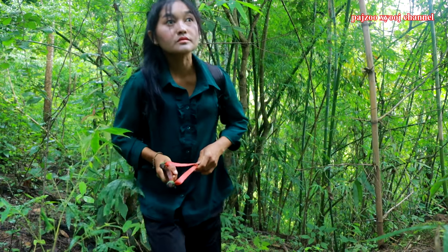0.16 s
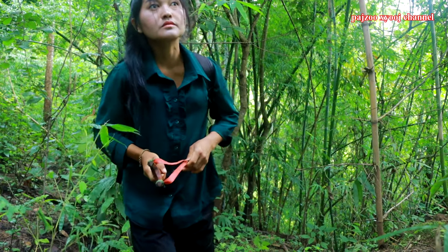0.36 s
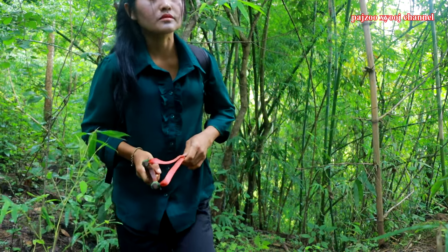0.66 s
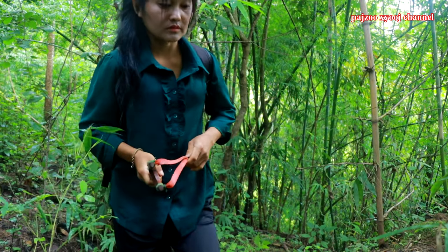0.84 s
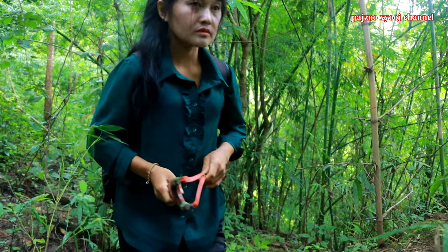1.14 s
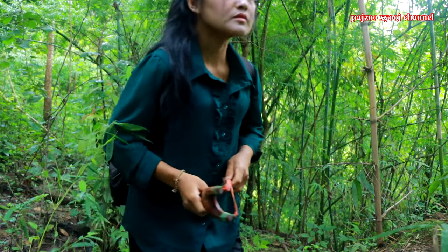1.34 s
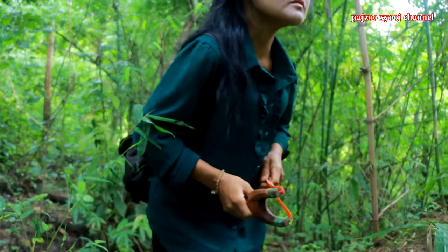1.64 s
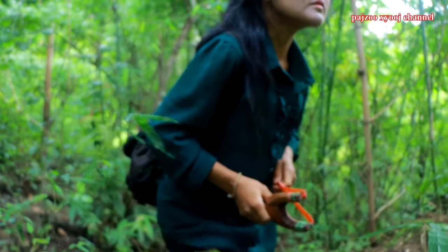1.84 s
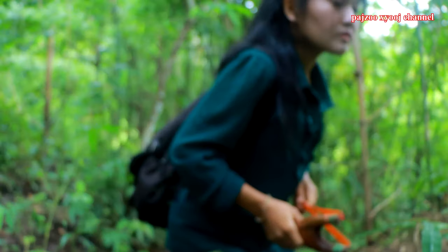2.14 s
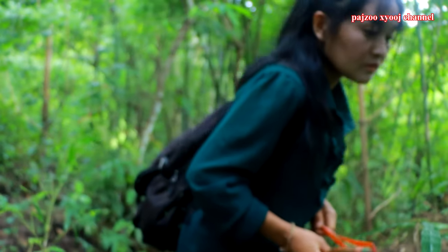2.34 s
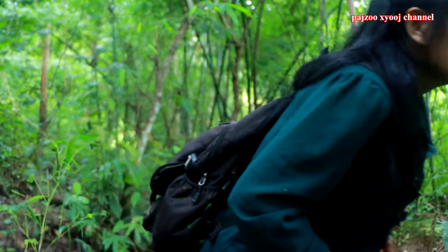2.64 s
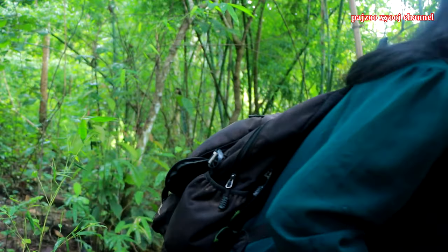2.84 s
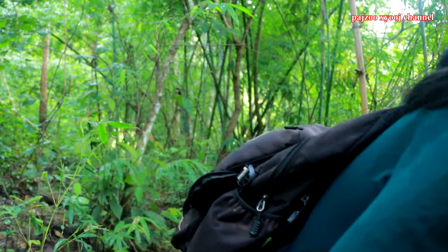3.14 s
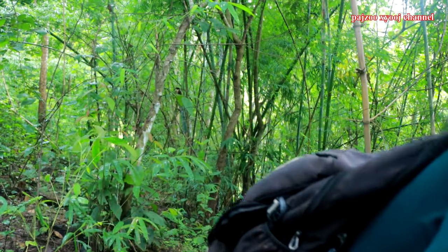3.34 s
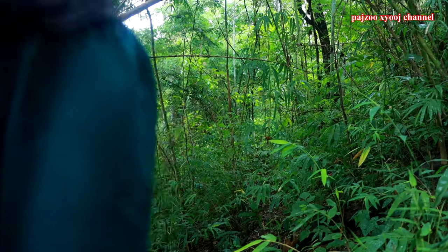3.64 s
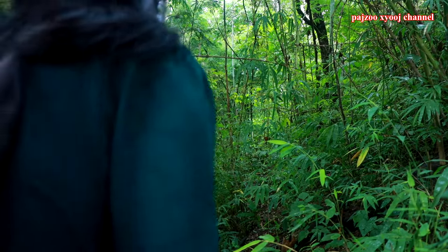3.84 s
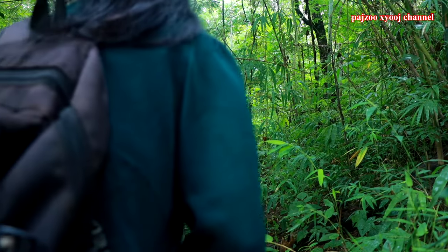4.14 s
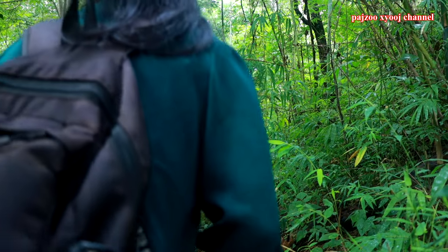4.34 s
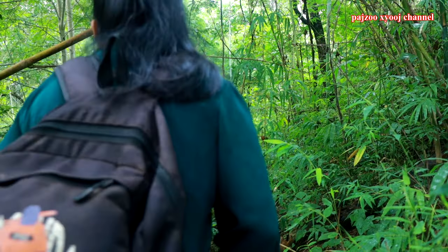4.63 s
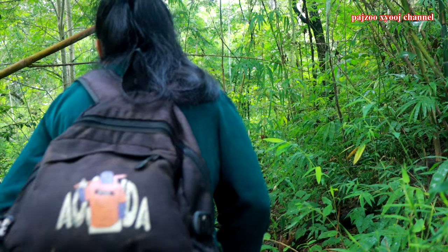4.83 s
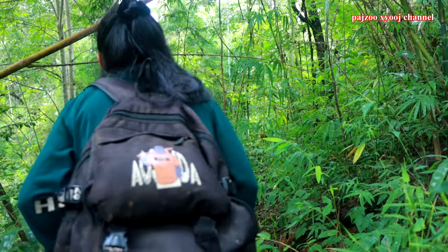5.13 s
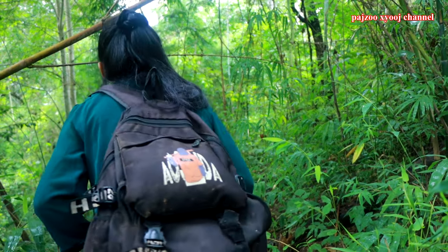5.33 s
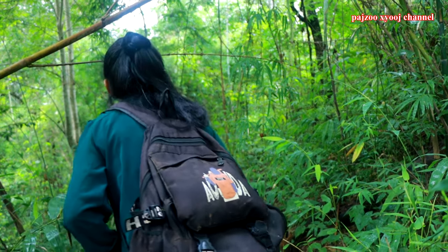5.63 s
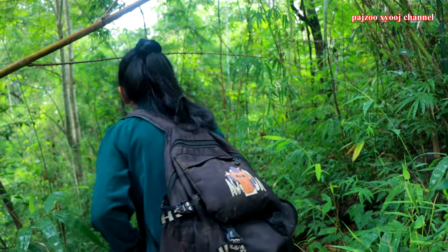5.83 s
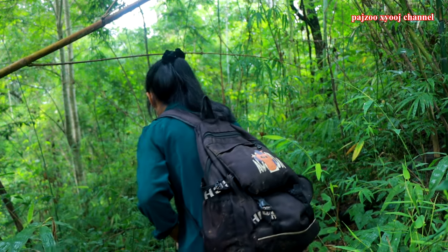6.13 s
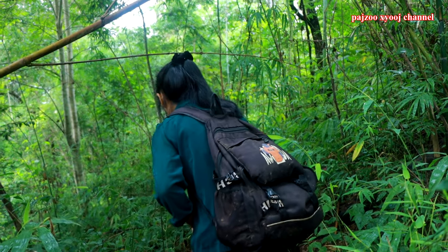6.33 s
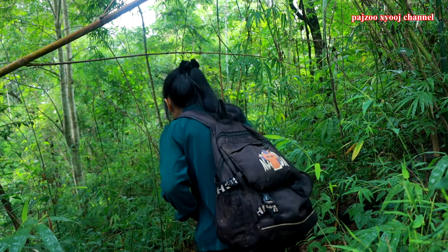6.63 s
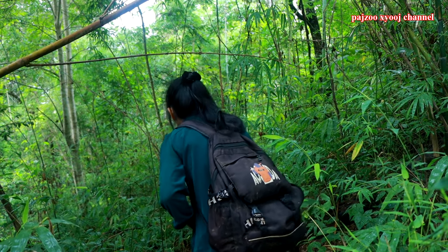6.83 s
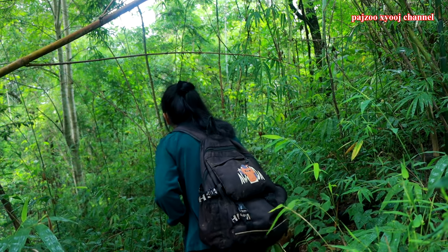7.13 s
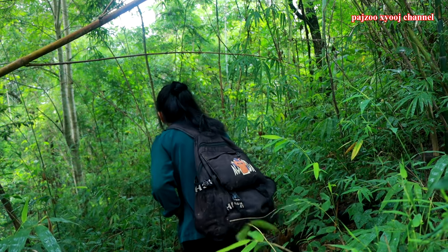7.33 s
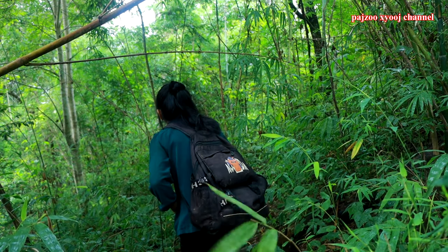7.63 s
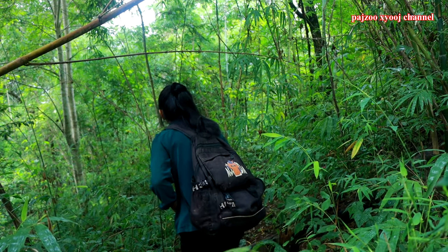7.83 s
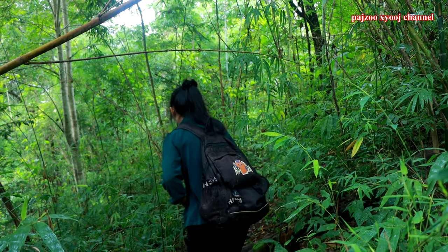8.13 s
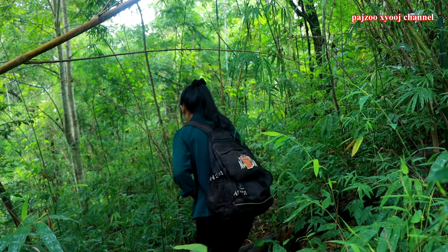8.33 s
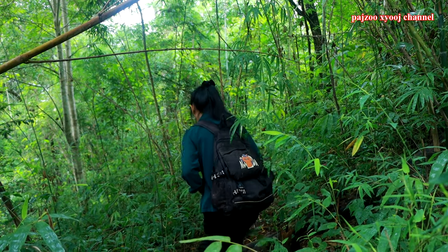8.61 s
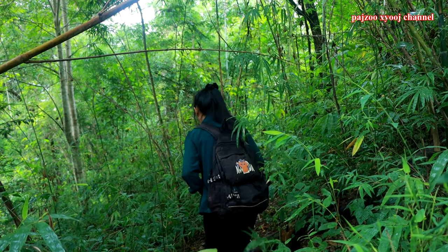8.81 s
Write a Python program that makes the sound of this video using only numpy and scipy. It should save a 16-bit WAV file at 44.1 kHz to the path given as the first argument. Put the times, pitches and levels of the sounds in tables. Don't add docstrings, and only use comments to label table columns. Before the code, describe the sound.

Throughout, a dense, high cicada drone surrounds a wide stereo outdoor microphone, over faint air hiss; bush-crickets rasp below it in swells about three times a second, and a thin steady cricket tone sits above. From 0 s someone creeps close by, with small leaf crackles and dry twig snaps. A far bird gives low, rounded hoots at 1.2-1.7 s. Leaf crunches and snaps thicken around 1.6-2.3 s, then again from 2.6 to 3.5 s, with soft foot thuds. At 3.65 s the sound dips for an instant, followed by a tight burst of cracks. The drone changes colour, trills join, and a nearer cicada throbs about 22 times a second. Steps become sparser. Hollow bamboo pings sound near 5.6, 6.5, 7.4 and 7.7 s, the last loudest with a snap and thud. A small bird peeps and whistles downward at 5.8-6.3 s, hoots return at 6.2-6.7 s, and peeps come again near 8.7 s amid final rustles.

```python
import sys
import numpy as np
from scipy import signal
from scipy.fft import rfft, irfft, next_fast_len
from scipy.io import wavfile

SR = 44100
rng = np.random.default_rng(int(sys.argv[2]) if len(sys.argv) > 2 else 0)


def attenuation_scalar(level_db):
    decades = np.asarray(level_db, float) / 20
    return 10 ** decades


def store_wav(level_fs):
    pcm = np.round(np.clip(np.atleast_2d(level_fs), -1, 1) * 32767)
    wavfile.write(sys.argv[1], SR, pcm.T.astype(np.int16))


N = 395577
CHANGE_S = 3.6555


def evened(x):
    return x / np.sqrt(np.mean(x ** 2) + 1e-20)


def read(points, hz):
    f, value = np.transpose(points)
    return np.interp(np.log(hz + 1), np.log(f + 1), value)


def curves(rows):
    s, *columns = np.transpose(rows)
    return [np.interp(np.arange(N) / SR, s, column) for column in columns]


def coloured(x, spectrum):
    length = next_fast_len(N, real=True)
    hz = np.fft.rfftfreq(length, 1 / SR)
    inside = (hz > spectrum[0][0]) & (hz < spectrum[-1][0])
    gain = attenuation_scalar(read(spectrum, hz)) * inside
    return evened(irfft(rfft(x, length) * gain, length)[..., :N])


def panned(x, left_minus_right_db):
    half_db = left_minus_right_db / 2
    return x * attenuation_scalar(np.array([half_db, -half_db]).reshape(2, -1))


def wander(per_s, size):
    knots = rng.standard_normal((size, int(per_s * 2 * N / SR)))
    knots = signal.resample(knots, N // 64 + 2, axis=1)
    at = np.arange(N) / 64
    return evened(np.array([np.interp(at, np.arange(len(row)), row) for row in knots]))


def resonate(x, hz, width_hz):
    turn = np.exp(2j * np.pi * hz * np.arange(N) / SR)
    r = np.exp(-np.pi * width_hz / SR)
    return 2 * (turn * signal.lfilter([(1 - r) ** 2], [1, -2 * r, r * r], x / turn)).real


def add(mix, s, sound):
    part = mix[:, round(s * SR):][:, :sound.shape[1]]
    part += sound[:, :part.shape[1]]


def forest(x, t60):
    t = np.arange(SR // 2) / SR
    taps = rng.standard_normal((2, len(t))) * attenuation_scalar(-60 * t / t60) * (t > .004)
    return signal.oaconvolve(x, taps / np.linalg.norm(taps[0]), axes=1)[:, :N]


# pitch_hz, level_db (per Hz)
AIR_SPECTRUM = [(18, -16), (45, -10.5), (90, -0.5), (140, 2), (400, -2), (1000, -2.5), (2000, -2.5),
                (3400, -3.5), (6600, -12), (7500, -4.5), (9500, -11), (12500, -7.5), (14000, -16),
                (16000, -10.5)]
# pitch_hz, likeness (1 = the same)
AIR_LIKENESS = [(60, 0.88), (130, 0.58), (290, 0.72), (640, 0.49), (1410, 0.14), (3100, -0.047),
                (6820, 0.079), (15000, -0.23)]


def air():
    length = next_fast_len(N, real=True)
    left, other = rfft(rng.standard_normal((2, length)))
    same = np.clip(read(AIR_LIKENESS, np.fft.rfftfreq(length, 1 / SR)), -1, 1)
    right = same * left + np.sqrt(1 - same ** 2) * other
    pair = irfft(np.array([left, right]), length)[:, :N]
    return attenuation_scalar(-52.5 + 0.4 * wander(7.6, size=1)) * coloured(pair, AIR_SPECTRUM)


# start_s, pitch_hz, width_hz, pulses_per_s (0 = steady), level_db
INSECT_TONES = [
    (3.66, 6355, 35, 40, -59),
    (3.66, 7770, 120, 55, -67),
    (0, 10950, 30, 0, -69),
    (3.66, 11540, 60, 0, -70),
]


def insect_tones():
    t, out = np.arange(N) / SR, 0
    for s, hz, width_hz, per_s, db in INSECT_TONES:
        pulses = np.cos(np.pi * per_s * t) ** 4 * (t > s)
        tone = evened(resonate(rng.standard_normal((2, N)), hz, width_hz))
        out = out + attenuation_scalar(db + 2.5 * wander(1.5, size=1)) * pulses * tone
    return out


# pitch_hz, level_db (per Hz)
RASP_SPECTRUM = [(3500, -9.5), (3800, 2), (4050, 9), (4300, 11), (4550, 9), (4800, -29), (5100, -53)]
# time_s, left_minus_right_db
GROUP_SIDE = [(0.0, 0.5), (4.19, -0.5), (8.97, -1)]
# time_s, swell_db
GROUP_SWELLS = [(.08, 1.5), (.3, 3.5), (.65, 1.5), (1.0, 3), (1.22, 4.5), (1.6, 4), (1.97, 3), (2.37, 4.5),
                (2.72, 6.5), (3.12, 5.5), (3.48, 4), (4.02, 3.5), (4.28, 0.5), (4.52, 4), (4.92, 2.5),
                (5.33, 4), (5.75, -1), (5.98, 3.5), (6.3, 4.5), (6.68, 3.5), (7.03, 2.5), (7.3, 2),
                (7.52, 4.5), (7.82, 5), (8.2, 1), (8.42, 4), (8.69, 5), (8.93, 3.5)]


def bush_crickets():
    base_db, half_width_s = -52.5, .085
    t, (pan_db,) = np.arange(0, N, 64) / SR, curves(GROUP_SIDE)
    db = base_db + sum(swell_db * np.exp(-((t - s) / half_width_s) ** 2) for s, swell_db in GROUP_SWELLS)
    db = np.interp(np.arange(N) / SR, t, db)
    teeth_per_s = 52 + 9 * wander(2.1, size=2)
    teeth = 1 + 0.35 * np.sin(2 * np.pi * np.cumsum(teeth_per_s, axis=1) / SR)
    rasp = coloured(teeth * rng.standard_normal((2, N)), RASP_SPECTRUM)
    below = resonate(rasp, 3970, 770)
    low, high = attenuation_scalar(2.2 * wander(9, size=2))
    return panned(attenuation_scalar(db + 4.0) * (low * below + high * (rasp - below)), pan_db)


# pitch_hz, level_db (per Hz)
CHORUS_BANDS = [
    [(4450, -35), (4700, -8.5), (4950, -16), (5200, 4), (5300, 1), (5370, 10), (5520, 5), (5700, 7.5),
     (5790, 0), (5900, -7.5), (6000, -5), (6200, -23), (6500, -20), (6800, -89)],
    [(4450, -27), (4700, -19.5), (4950, -17), (5200, -6), (5300, -1.5), (5370, 2.5), (5520, -2),
     (5720, 0.5), (5790, -4.5), (5900, -7), (6000, -20.5), (6200, -21), (6500, -29.5), (6800, -105)],
]
# pitch_hz, level_db (per Hz)
CHORUS_OCTAVES = [
    [(9800, -68), (10500, 5), (10880, 17), (10950, 11), (11050, 2), (11350, 17), (11600, 4), (12300, -44)],
    [(9800, -64), (10500, 0), (10880, 1.5), (10950, -9), (11120, -1), (11350, 0), (11540, 0.5), (11620, -1),
     (12300, -37)],
]
# time_s, level_db, left_minus_right_db, overtone_level_db
CHORUS_LEVEL = [(0.0, -36.5, 1, -57.5), (3.42, -37, 2, -57), (3.7, -36, -1.5, -56), (6.64, -36, 0.5, -55.5),
                (7.14, -36.5, -1.5, -55.5), (7.79, -35, 1, -56.5), (8.97, -36.5, -0.5, -55)]


def chorus():
    db, pan_db, overtone_db = curves(CHORUS_LEVEL)
    clicks = rng.standard_normal((2, 2, N)) * (rng.random((2, 2, N)) < .2)
    later = np.arange(N) > CHANGE_S * SR
    band_before, band_after = [coloured(clicks[0], spectrum) for spectrum in CHORUS_BANDS]
    octave_before, octave_after = [coloured(clicks[1], spectrum) for spectrum in CHORUS_OCTAVES]
    band = np.where(later, band_after, band_before)
    octave = np.where(later, octave_after, octave_before)
    band[1] += 0.16 * np.roll(band[0], shift=3)
    flutter = attenuation_scalar(0.052 * wander(40, size=2))
    return flutter * panned(attenuation_scalar(db + 4.0) * band + attenuation_scalar(overtone_db) * octave, pan_db)


# time_s, throb_lead_turns, level_db
NEAR_SONG = [(3.66, -.02, -45), (4.7, .29, -43), (5.5, .46, -43), (7.1, .64, -44), (8.55, .78, -42),
             (8.97, .8, -54)]
# place_turns, length_turns, lead_share, pitch_hz,
# level_db, overtone_level_db
NEAR_RIBS = [
    (0., .5, 1, 5725, 0, -7),
    (.255, .4, -.3, 5905, -7, -26),
    (.6, .3, 1, 5660, -5, -22),
    (0., .45, 1, 5785, -14, -12),
    (0., .35, 1, 5920, -16, -11),
]


def near_cicada():
    throbs_per_s = 22.1
    lead, db = curves(NEAR_SONG)
    t, song = np.arange(N) / SR, 0
    for place, length, share, hz, rib_db, overtone_db in NEAR_RIBS:
        off = (throbs_per_s * t + share * lead - place + .5) % 1 - .5
        burst = np.cos(np.pi * np.clip(off / length, -.5, .5)) ** 2
        phase = 2 * np.pi * np.cumsum(hz + 16 * wander(30, size=1), axis=1) / SR
        song = song + burst * (attenuation_scalar(rib_db) * np.sin(phase) + attenuation_scalar(overtone_db) * np.sin(2 * phase))
    song = attenuation_scalar(db - 1.5) * song * (t > CHANGE_S)
    echo = attenuation_scalar(-7) * forest(song, t60=.3)
    return panned(song, -1.5) * attenuation_scalar(1.3 * wander(8, size=2)) + echo


def bird(notes, glide, loudest, waver_hz, wet_db, t60, pan_db):
    song, waver = np.zeros((1, N)), waver_hz * wander(70, size=1)[0]
    flutter = attenuation_scalar(3.0 * wander(25, size=2))
    for s, length, from_hz, to_hz, db in notes:
        t = np.arange(s, min(s + length, (N - 1) / SR), 1 / SR)
        u = (t - s) / length
        hz = to_hz + (from_hz - to_hz) * (1 - np.minimum(u / glide, 1)) ** 1.4
        tone = np.sin(2 * np.pi * np.cumsum(hz + waver[(t * SR).astype(int)]) / SR)
        level_db = db + np.interp(u, [0, loudest, 1], [-7, 0, -7])
        note = attenuation_scalar(level_db) * tone * signal.windows.tukey(len(t), .4)
        add(song, s, note[None])
    return flutter * panned(song, pan_db) + attenuation_scalar(wet_db) * forest(song, t60)


# start_s, length_s, from_hz, to_hz, level_db
HOOT_NOTES = [(1.155, .16, 1030, 1385, -50), (1.28, .075, 1380, 1385, -56), (1.2, .1, 1110, 1125, -55),
              (1.34, .11, 1180, 1262, -47), (1.42, .15, 1260, 1265, -56), (1.51, .08, 1070, 1165, -53),
              (1.575, .09, 1095, 1160, -52), (6.175, .08, 1080, 1230, -52), (6.225, .075, 1300, 1365, -50),
              (6.27, .06, 1310, 1280, -55), (6.3, .09, 1250, 1200, -54), (6.37, .075, 1190, 1270, -50),
              (6.43, .13, 1255, 1270, -53), (6.535, .07, 1095, 1175, -53), (6.575, .14, 1180, 1155, -50),
              (8.95, .06, 1150, 1240, -51)]


def far_bird():
    return bird(HOOT_NOTES, glide=.7, loudest=.4, waver_hz=22, wet_db=0, t60=.6, pan_db=.4)


# start_s, length_s, from_hz, to_hz, level_db
WHISTLE_NOTES = [
    (5.848, .05, 3620, 3640, -45),
    (5.935, .05, 4030, 4150, -49),
    (5.995, .042, 4130, 4140, -46),
    (6.03, .21, 3720, 2770, -50),
    (6.06, .22, 3750, 2900, -54),
    (8.67, .06, 3920, 3920, -53),
    (8.745, .06, 3290, 3400, -53),
    (8.78, .09, 3400, 3750, -52),
    (8.85, .115, 3650, 3510, -52),
    (8.88, .05, 3250, 3280, -55),
]


def small_bird():
    return bird(WHISTLE_NOTES, glide=.9, loudest=.5, waver_hz=55, wet_db=4.5, t60=.7, pan_db=-1.5)


# time_s, peak_db, pitch_hz
FOOT_THUDS = [(1.417, -46, 288), (1.927, -53, 353), (2.969, -49, 350), (3.37, -43, 431), (3.412, -46, 382),
              (3.677, -45, 226), (3.689, -49, 145), (3.701, -46, 226), (3.71, -45, 476), (3.722, -49, 215),
              (5.05, -54, 143), (7.683, -50, 498), (7.686, -43, 330)]


def thuds():
    out, t = np.zeros((2, N)), np.arange(2000) / SR
    for s, db, hz in FOOT_THUDS:
        push = np.sin(2 * np.pi * hz * t) * attenuation_scalar(db + 7 - 60 * t * hz / 4)
        add(out, s + 0.0012, push[None])
    return signal.lfilter(*signal.butter(2, 130, "high", fs=SR), out)


# start_s, length_s, crackle_db, crunch_relative_db
LEAF_BRUSHES = [(0.02, 0.13, -57, -2.5), (0.133, 0.3, -63, 4.5), (0.949, 0.082, -54, -2),
                (1.603, 0.23, -52, -0.5), (1.898, 0.12, -53, 1), (1.81, 0.11, -56, 1),
                (2.024, 0.12, -48.5, 0), (2.11, 0.035, -53, 1), (2.171, 0.066, -48, -2.5),
                (2.587, 0.14, -63.5, 9.5), (2.73, 0.21, -57, 4.5), (2.85, .45, -58, 3),
                (3.25, .21, -55.5, 2), (3.656, .055, -55, 7), (4.003, 0.055, -59, -18),
                (4.3, 0.077, -71.5, 17), (5.196, 0.29, -64.5, 6.5), (5.48, 0.55, -58.5, -7),
                (5.95, 0.46, -64.5, 5.5), (6.46, 0.41, -59.5, 3.5), (6.835, 0.3, -54.5, -2),
                (7.139, 0.29, -55, -4.5), (7.655, 0.074, -55.5, -1.5), (7.76, .06, -66, -8),
                (8.535, 0.15, -54.5, 2.5), (8.68, 0.18, -62.5, -3)]


def steps():
    rise_share, fall_s = 0.42, 0.034
    t = np.arange(0, N, 64) / SR
    power = attenuation_scalar([[-70], [-62.5]]) ** 2 * np.ones(len(t))
    for s, length, db, crunch_db in LEAF_BRUSHES:
        rise = np.clip((t - s) / (rise_share * length), 0, 1)
        shape = rise * np.exp(-np.maximum(t - s - length, 0) / fall_s)
        power = power + (attenuation_scalar([[db], [db + crunch_db]]) * shape) ** 2
    return [np.interp(np.arange(N) / SR, t, np.sqrt(p)) for p in power]


# pitch_hz, level_db (per Hz)
CRACKLE_SPECTRUM = [(1200, -5), (2400, 4), (3300, 1.5), (4500, 4), (7000, -0.5), (12000, 1), (14000, -2),
                    (16000, -14)]
# pitch_hz, level_db (per Hz)
CRUNCH_SPECTRUM = [(300, -3.5), (600, -5), (900, -1), (1500, -4), (2600, -10), (3400, -7)]
# pitch_hz, left_minus_right_db
CRUNCH_LEAN = [(60, 0.0), (110, -6), (200, 11), (380, 3.5), (700, -2), (1290, 8.5), (2380, -20.5),
               (4400, -8), (8120, 0.0), (15000, 0.5)]


def leaves():
    crackly, crunchy = steps()
    size = attenuation_scalar(3.54 * np.minimum(rng.exponential(1, (3, N)), 3.6)) * rng.choice([-1., 1.], (3, N))
    cracks = size * (rng.random((3, N)) < 4500 / SR)
    cracks = cracks[:2] + 0.48 * cracks[2]
    struck = size * (rng.random((3, N)) < 900 / SR)
    bit, crunch = rng.integers(0, 10, size=(3, N)), 0
    for k, hz in enumerate(np.geomspace(330, 3300, num=10)):
        t = np.arange(0, 10 / hz, 1 / SR)
        ring = np.sin(2 * np.pi * hz * t) * attenuation_scalar(-60 * t * hz / 12) * (1 - np.exp(-t * hz))
        ring = ring / np.linalg.norm(ring) * attenuation_scalar(read(CRUNCH_SPECTRUM, hz)) * np.sqrt(hz)
        rung = signal.oaconvolve(struck * (bit == k), ring[None], axes=1)[:, :N]
        apart = hz / 700
        pair = (rung[:2] * apart + rung[2]) / np.hypot(apart, 1)
        crunch = crunch + panned(pair, read(CRUNCH_LEAN, hz))
    clumps = attenuation_scalar(2.5 * wander(22, size=2) - 1)
    crackle = attenuation_scalar(6.0) * crackly * clumps[0] * coloured(cracks, CRACKLE_SPECTRUM)
    return crackle + attenuation_scalar(1.5) * crunchy * clumps[1] * evened(crunch)


# time_s, peak_db, pitch_hz, t60_s, left_minus_right_db
BAMBOO_PINGS = [
    (5.566, -32, 1830, 0.011, -2),
    (5.598, -40, 1880, 0.033, -8),
    (5.641, -44, 2600, 0.038, -6),
    (6.443, -44, 2750, .02, 0),
    (6.647, -37, 2400, .018, -2),
    (7.408, -32, 2550, 0.023, -13),
    (7.688, -28.5, 2580, 0.033, -5),
]


def pings():
    out, t = np.zeros((2, N)), np.arange(3000) / SR
    for s, db, hz, t60, pan_db in BAMBOO_PINGS:
        ring = np.sin(2 * np.pi * hz * t) * attenuation_scalar(db - 60 * t / t60) * (1 - np.exp(-t / 0.00045))
        add(out, s, panned(ring[None], pan_db))
    return out


# pitch_hz, level_db (per Hz)
CRACK_SPECTRUM = [(150, -22), (500, -6), (1500, 1), (3500, 5.5), (6000, -3.5), (12000, -10.5), (16000, -13)]
# pitch_hz, level_db (per Hz)
TICK_SPECTRUM = [(3000, -29), (6500, -3), (9000, -4), (13000, 0), (16000, -35)]
# time_s, peak_db, ring_hz, left_minus_right_db
TWIG_SNAPS = [(0.091, -30, 1310, -7.5), (0.701, -38, 2720, -6), (1, -35.5, 3080, -5.5),
              (1.419, -36, 1230, 5.5), (1.419, -34.5, 3400, 5), (1.561, -32, 1730, 2),
              (1.737, -36.5, 1900, -1), (1.794, -30, 2380, -2.5), (1.927, -33, 2100, 1),
              (1.927, -41, 900, 1), (1.794, -42.5, 950, -3), (2.131, -36.5, 900, 0), (2.229, -36, 1050, 4),
              (2.641, -36, 960, 1.5), (2.684, -30, 2840, -2), (2.754, -37, 2850, -5),
              (2.814, -28.5, 2320, 2), (2.976, -35, 3400, 5), (3.371, -31, 2750, -6),
              (3.371, -31, 1100, -3), (3.371, -33, 4100, -6), (3.709, -31, 3100, -2),
              (3.413, -33, 2600, -5), (3.457, -28, 3350, -6), (3.458, -39, 1200, -3),
              (3.661, -34, 2580, -1), (3.668, -27, 1540, -1.5), (3.684, -24.5, 2560, -1),
              (3.697, -25.5, 2900, -3), (3.717, -33, 3500, 6), (3.691, -33, 2600, 0), (3.708, -38, 1150, 0),
              (3.685, -33, 1400, 0), (4.772, -38, 3350, -3), (4.914, -36.5, 3150, 1), (5.449, -35, 3120, 2),
              (7.338, -32.5, 2560, 1.5), (7.685, -33, 2640, -6), (7.687, -34, 2630, -7),
              (7.689, -39, 1220, -6), (7.797, -38.5, 2590, 0), (4.327, -45, 490, 0), (7.684, -31, 1520, -3),
              (8.649, -34.5, 1720, 0.5)]
# time_s, peak_db, ring_hz
STEM_SNAPS = [(1.043, -43, 2280), (1.818, -37.5, 1310), (2.312, -40, 990), (3.613, -41, 990),
              (5.246, -38, 930), (5.33, -47, 1660), (5.792, -43, 1130), (6.692, -37.5, 1750),
              (6.751, -42, 1020), (7.553, -41, 900), (7.599, -45, 1380), (7.654, -39, 1180),
              (7.839, -44, 1140), (8.141, -42, 2490), (8.612, -39, 2410), (0.049, -52, 2890),
              (.077, -37, 2820), (.475, -41.5, 1890), (.657, -47, 1770), (.973, -46, 3020),
              (1.191, -41, 2200), (1.269, -44, 1990), (1.34, -44, 2720), (1.389, -40.5, 2590),
              (1.443, -46, 2400), (1.462, -46, 2300), (1.757, -44, 2700), (1.9, -48, 900),
              (1.989, -39, 1750), (2.012, -43, 885), (2.05, -48, 3450), (2.061, -43, 746),
              (2.091, -42, 765), (2.144, -39, 704), (2.253, -38, 1040), (2.725, -48, 3140),
              (2.775, -42, 2480), (2.96, -50, 525), (3.036, -50, 605), (3.262, -41, 2520),
              (3.274, -36, 3370), (3.305, -34, 3400), (3.307, -44, 950), (3.315, -44, 710),
              (4.361, -46, 1950), (6.023, -42, 1780), (6.788, -42.5, 1360), (6.968, -42, 3030),
              (7.249, -46, 1930), (7.262, -47, 1890), (7.361, -32, 3360), (7.38, -44.5, 1160),
              (7.614, -44, 1400), (7.938, -51, 2500), (8.45, -54, 1080), (8.524, -46, 1790),
              (8.595, -44, 1910), (8.779, -43, 2400), (8.816, -49, 3000), (8.919, -39.5, 1300)]
# time_s, peak_db, left_minus_right_db
LEAF_TICKS = [(0.1103, -37, 3), (0.927, -39.5, 0), (1.703, -41, 7), (1.739, -44, 15), (1.793, -44, 7),
              (1.927, -40, 6), (1.978, -36.5, 5), (1.991, -37, 2), (2.0605, -40, 0.5), (2.1323, -43, 0),
              (2.205, -27.5, 3), (2.6417, -40, -6), (2.6838, -31.5, -4), (2.8135, -40, -1.5),
              (3.046, -47, 0), (3.3548, -52, -2.5), (3.3718, -30, -4), (3.4106, -42, -5), (3.6252, -45, -3),
              (3.662, -44, 4), (3.684, -39, 3), (5.289, -48, -0.5), (5.451, -36, 4), (5.707, -45, 2),
              (6.518, -43, -7), (7.683, -45, -3), (7.797, -40, 1.5), (8.5954, -46, 10), (8.6254, -35, 5),
              (6.528, -43, 0), (6.545, -42, -2)]


def snaps():
    out, t = np.zeros((2, N)), np.arange(1200) / SR
    wood = coloured(rng.standard_normal((2, N)), CRACK_SPECTRUM)
    leaf = coloured(rng.standard_normal((2, N)), TICK_SPECTRUM)
    for s, db, hz, pan_db in TWIG_SNAPS + [(*stem, 0) for stem in STEM_SNAPS]:
        late = np.clip(t + np.array([[1], [-1]]) * pan_db * 2.5e-5, 0, 1)
        ring = np.sin(2 * np.pi * hz * late) * attenuation_scalar(-60 * late * hz / 18) * (1 - np.exp(-late * hz * 3.9))
        fade = attenuation_scalar(-60 * t / 0.008) + .12 * attenuation_scalar(-60 * t / 0.04)
        splinter = wood[:, round(s * SR):][:, :len(t)] * fade
        add(out, s + .0008, panned(attenuation_scalar(db + 3.5) * (0.95 * ring + 0.65 * splinter), pan_db))
    for s, db, pan_db in LEAF_TICKS:
        fade = attenuation_scalar(-60 * t / 0.007) + 0.1 * attenuation_scalar(-60 * t / 0.06)
        bright = leaf[:, round(s * SR):][:, :len(t)] * fade
        add(out, s, panned(attenuation_scalar(db + 5.0) * bright, pan_db))
    out = signal.lfilter(*signal.butter(2, 250, "high", fs=SR), out)
    return out + attenuation_scalar(-10) * forest(out, t60=0.097)


def scene():
    insects = insect_tones() + bush_crickets() + chorus() + near_cicada()
    birds = far_bird() + small_bird()
    walker = thuds() + leaves() + pings() + snaps()
    return air() + insects + birds + walker


def top_cut(x):
    return signal.sosfilt(signal.butter(12, 16320, fs=SR, output="sos"), x)


def record(dry):
    dip = np.clip(abs(np.arange(N) / SR - CHANGE_S) / .007, .2, 1)
    lowpass = signal.firwin(511, 15830, window=("kaiser", 9), fs=SR)
    limited = signal.oaconvolve(dry * dip, lowpass[None], "same")
    return top_cut(limited)


dry = scene()
out = record(dry)
store_wav(out)
```